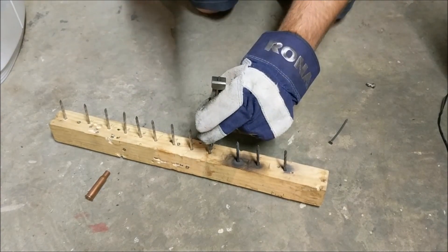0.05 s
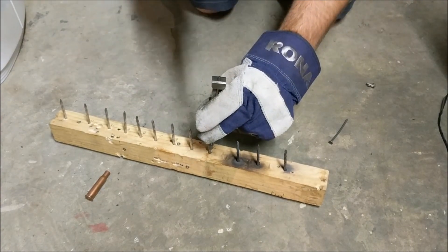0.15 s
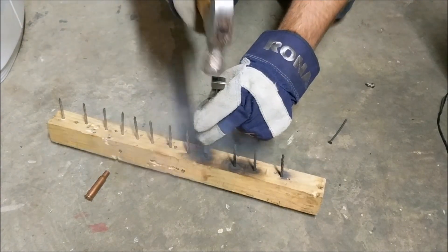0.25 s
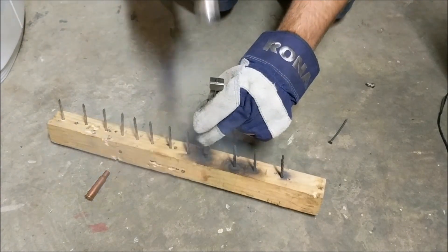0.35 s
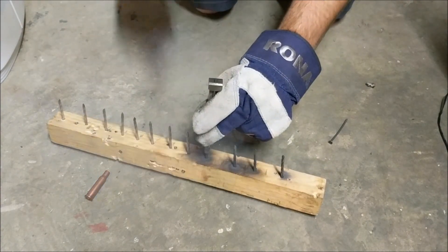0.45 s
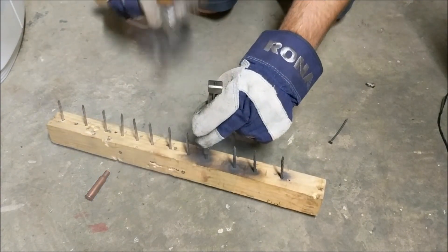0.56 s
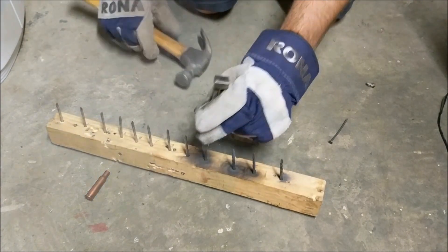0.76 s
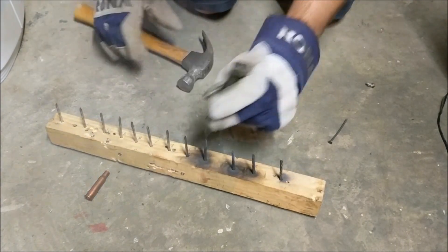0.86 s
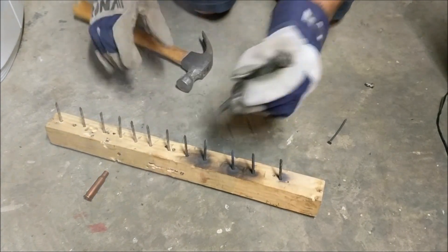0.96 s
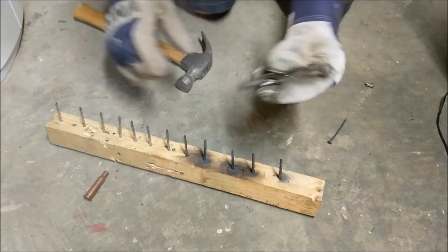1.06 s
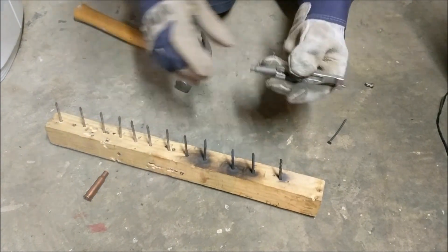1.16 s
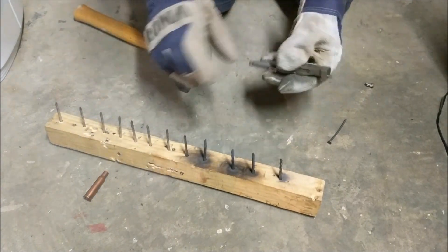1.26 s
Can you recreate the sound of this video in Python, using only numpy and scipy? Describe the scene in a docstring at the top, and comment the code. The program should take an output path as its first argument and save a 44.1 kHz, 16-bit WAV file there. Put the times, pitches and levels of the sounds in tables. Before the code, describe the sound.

A loud bang from a hammer strike, then a steel piece clattering on concrete.

```python
"""A hard-walled workshop. A hammer sets off a primer on a nail in a wooden plank: one bang rings
the plank, fills the room and overloads the recorder. Then a steel piece lands on the concrete
floor, tumbles and bounces to rest; each contact clacks, knocks the floor and rings the steel.
A soft low bump sounds amid the bounces, over quiet room noise and mains hum."""
import sys
import numpy as np
from scipy import signal
from scipy.fft import rfft, irfft, next_fast_len
from scipy.io import wavfile
from scipy.ndimage import uniform_filter1d

SR = 44100
rng = np.random.default_rng(int(sys.argv[2]) if len(sys.argv) > 2 else 0)


def master_out(mix):
    """Clip the mix to full scale and print it as 16-bit PCM to the path in sys.argv[1]."""
    frames = np.transpose(np.atleast_2d(mix))
    ceiling = np.clip(frames, -1, 1)
    pcm = np.round(ceiling * 32767).astype(np.int16)
    wavfile.write(sys.argv[1], SR, pcm)


N = 57330
TIME_S = np.arange(N) / SR


def amp(db):
    """dB to gain."""
    return 10 ** (np.asarray(db) / 20)


def along(points, hz):
    """(f/Hz, value) points interpolated on a log frequency axis."""
    point_hz, values = np.transpose(points)
    return np.interp(np.log(hz + 1), np.log(point_hz + 1), values)


def noise(gain_db):
    """Unit-rms noise with spectral shape gain_db(hz)."""
    size = next_fast_len(N + 8192)
    gain = amp(gain_db(np.fft.rfftfreq(size, 1 / SR)))
    x = irfft(rfft(rng.standard_normal(N), size) * gain, size)[:N]
    return x / x.std()


def fade(t60_s):
    """Exponential decay, 60 dB in t60_s."""
    return amp(-60 * TIME_S / t60_s)


def band_decay(x, t60_points):
    """Decay x per frequency, from (f/Hz, T60/s) points."""
    hz, t_s, spectra = signal.stft(x, SR, nperseg=256)
    decay = amp(-60 * t_s / along(t60_points, hz)[:, None])
    return signal.istft(spectra * decay, SR, nperseg=256)[1][:N]


def ring(modes):
    """Damped sines from (f/Hz, level/dB, T60/s) rows."""
    return sum(amp(db) * fade(t60_s) * np.sin(2 * np.pi * hz * TIME_S) for hz, db, t60_s in modes)


def at(start_s, x):
    """x delayed by start_s."""
    return np.pad(x, (int(start_s * SR), 0))[:N]


def below(hz, edge_hz):
    """Soft step: 1 under the edge, 0 above."""
    return 1 / (1 + (hz / edge_hz) ** 8)


def near(hz, centre_hz, width_oct=0.1):
    """Bell on a log frequency axis, 1 at the centre."""
    return np.exp(-(np.log2(hz / centre_hz) / width_oct) ** 2)


def background(hum_hz=120, hum_db=-64.5, noise_db=-64.5):
    """Mains hum and quiet room noise."""
    # room noise spectrum: f/Hz, level/dB
    colour = [(25, -11.5), (60, -1), (117, -5), (250, -16.5), (600, -16), (2000, -22), (6400, -28),
              (15000, -30.5)]
    hum = amp(hum_db) * np.sin(2 * np.pi * hum_hz * TIME_S)
    return hum + amp(noise_db) * noise(lambda hz: along(colour, hz))


def bump():
    """Soft low bump: one damped sine."""
    # low mode: f/Hz, level/dB, T60/s
    mode = [(57.4, -30, 0.2)]
    return ring(mode)


def in_room(x, tail_db=-7.5, early_db=-11):
    """x plus early echoes off the floor and near objects, and a reverberant tail."""
    # room decay: f/Hz, T60/s
    tail_t60 = [(150, 1), (400, 0.92), (1000, 0.39), (3000, 0.23), (8000, 0.23), (15000, 0.17)]
    tail = band_decay(rng.standard_normal(N), tail_t60)
    early = rng.standard_normal(N) * fade(t60_s=0.056)
    response = amp(tail_db) * tail / np.linalg.norm(tail) + amp(early_db) * early / np.linalg.norm(early)
    return x + signal.fftconvolve(x, response)[:N]


def steel_contact(knock_db, main_db, ping_db, treble_db, hardness_db):
    """Steel hits concrete: ring, clack and floor knock. The point struck favours some modes."""
    # steel modes: f/Hz, level/dB, T60/s
    modes = [(1313, -20.5, 0.15), (1553.5, -19.5, 0.19), (1592, -18, 0.14), (2856, -7.5, 0.027),
             (2912, -6, 0.036), (2930, -8.5, 0.1), (3090, -26, 0.055), (3370, -8.5, 0.044),
             (3508, -15, 0.17), (4282, -11.5, 0.069), (4681, -13.5, .12), (5240, -13, 0.085),
             (7705, -10, 0.053), (10930, -30.5, 0.031), (12900, -37.5, 0.084)]
    # clack and floor knock spectra: f/Hz, level/dB
    clack_colour = [(200, -19), (1100, -14.5), (1900, 2.5), (2400, -4.5), (3100, 2), (4000, -6), (5200, 0),
                    (6500, -19.5), (9500, -23), (13000, -35), (16000, -54)]
    knock_colour = [(30, -29), (75, -8.5), (130, -0.5), (250, -5.5), (700, 0), (1500, 4), (3000, -1),
                    (8000, -55)]
    contact_s = 0.0007
    swell = 1 - np.exp(-TIME_S / contact_s)  # ring builds while the piece touches
    treble = lambda hz: 1 - below(hz, 6800)
    low_db = lambda hz: 0.79 * knock_db * below(hz, 2590)  # a flat landing also drives the low modes
    strike_db = lambda hz: main_db * near(hz, 2890) + ping_db * near(hz, 4671) + treble_db * treble(hz)
    steel = ring([(hz, db + low_db(hz) + strike_db(hz), t60_s) for hz, db, t60_s in modes])
    clack_shape_db = lambda hz: along(clack_colour, hz) + low_db(hz) + hardness_db * treble(hz)
    clack = amp(-0.5) * noise(clack_shape_db) * fade(t60_s=0.037)
    knock = amp(knock_db - 11) * noise(lambda hz: along(knock_colour, hz)) * fade(t60_s=0.04)
    return swell * steel + np.sqrt(swell) * (clack + knock)


def tumbling_steel():
    """The piece bounces to rest, each contact with its own room echo."""
    # floor contacts: t/s, level/dB, knock/dB, main ring/dB, ping/dB, treble ring/dB, clack hardness/dB
    contacts = [(0.6821, -7.5, 5.5, -7, 15, -12.5, -3.5), (0.705, -20, 11.5, 4, 20, -0.5, -22),
                (0.7655, -9, 4, 3, -10, -1, 15), (0.786, -23, 12, 8, 11, -9, -28),
                (0.7957, -14, -3, 8.5, -3, -4, -47), (.8280, -13, 1.5, 2, -17, 13.5, 14),
                (.8390, -13, -4, 9, -7, -16, -16), (.8435, -19.5, 10.5, 9, 12, 24, 32),
                (0.8601, -3.5, -7.5, 7, 2, -31, -7), (.8750, -23, -15, 11, 12, 15.5, 13),
                (0.9792, -8.5, -10, 5.5, -4, -17, -7), (0.999, -20, 1, 8.5, 7, 13.5, 8),
                (1.0717, -12, -7.5, 0, 4, -11, -13), (1.1349, -16, -10.5, -9, -1, -3, -21),
                (1.1460, -26.5, -13, 6, 15.5, 8.5, -2), (1.1741, -25.5, -4.5, -0.5, 7, -3, -8),
                (1.208, -29.5, 0.5, -21, -2.5, 0, 3)]
    return sum(at(t_s, amp(db) * in_room(steel_contact(*timbre_db))) for t_s, db, *timbre_db in contacts)


def primer_bang(crack_db=8, walls_db=12, late_db=-27.5, build_s=0.012):
    """Direct crack, dense wall reflections, slow low reverberation and the ringing plank."""
    # crack, wall reflection and late reverberation spectra: f/Hz, level/dB
    crack_colour = [(25, -9.5), (60, -2.5), (150, 8), (280, -2.5), (600, 2.5), (1200, -4), (2400, -9.5),
                    (4500, -10), (7500, -8), (14000, -12.5)]
    walls_colour = [(25, -22.5), (60, -8), (130, -9.5), (260, -4.5), (500, -0.5), (1100, -1), (2400, -4.5),
                    (4500, -7.5), (7500, -16.5), (14000, -17.5)]
    late_colour = [(30, -7.5), (60, -6.5), (130, 0.5), (250, -4.5), (650, -1.5), (1400, -16), (2200, -22.5),
                   (10000, -38.5)]
    # wall reflection decay: f/Hz, T60/s
    walls_t60 = [(60, 0.2), (250, 0.21), (600, .29), (2000, 0.27), (5000, 0.29), (9000, 0.27),
                 (15000, 0.19)]
    # plank and nail modes: f/Hz, level/dB, T60/s
    plank_modes = [(58, 1.5, 0.16), (361, -8.5, 0.31), (472.2, -8.5, 0.39), (607, 0.5, 0.17),
                   (1092, -18.5, 0.24), (1145, -4, 0.39), (1490, -33.5, 0.69)]
    crack = amp(crack_db) * noise(lambda hz: along(crack_colour, hz)) * fade(t60_s=0.073)
    build_up = 1 - 0.5 * np.exp(-TIME_S / build_s)
    walls = amp(walls_db) * build_up * band_decay(noise(lambda hz: along(walls_colour, hz)), walls_t60)
    late = amp(late_db) * noise(lambda hz: along(late_colour, hz)) * fade(t60_s=1.23)
    return crack + walls + late + ring(plank_modes)


def scene():
    """Bang, tumbling steel and bump over the quiet room; mono."""
    bang_s, bump_s = 0.2367, 0.856
    return (at(bang_s, primer_bang()) + tumbling_steel() + at(bump_s, bump()) + background())[None]


def record(dry):
    """Recorder: low cut, compressor, soft clipping, band limit."""
    low_cut_hz, top_hz, ceiling = 67, 15800, 0.92
    threshold_db, slope, sense_s, release_db_per_s = -8, 0.85, 0.0036, 119.5
    x = signal.sosfilt(signal.butter(2, low_cut_hz, "high", fs=SR, output="sos"), dry[0])
    power = np.abs(uniform_filter1d(x * x, int(sense_s * SR)))
    level_db = 10 * np.log10(power + 1e-12)
    target_db = slope * np.minimum(0, threshold_db - level_db)
    recovery_db = release_db_per_s * TIME_S
    gain_db = np.minimum.accumulate(target_db - recovery_db) + recovery_db  # drops at once, rises slowly
    compressed = x * amp(gain_db)
    clipped = compressed / (1 + np.abs(compressed / ceiling) ** 6) ** (1 / 6)
    low_pass = signal.firwin(161, top_hz, window="blackman", fs=SR)
    return signal.fftconvolve(clipped, low_pass, "same")[None]


dry = scene()
out = record(dry)
master_out(out)
```